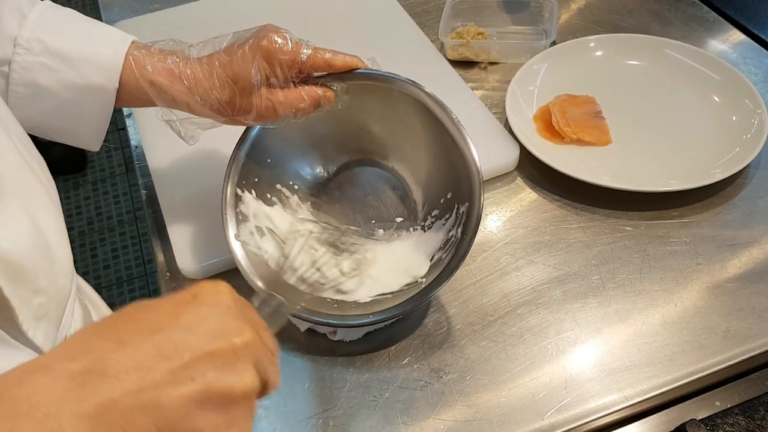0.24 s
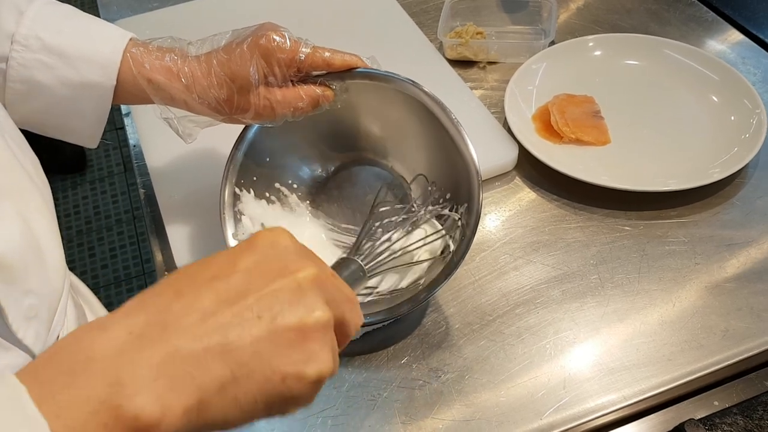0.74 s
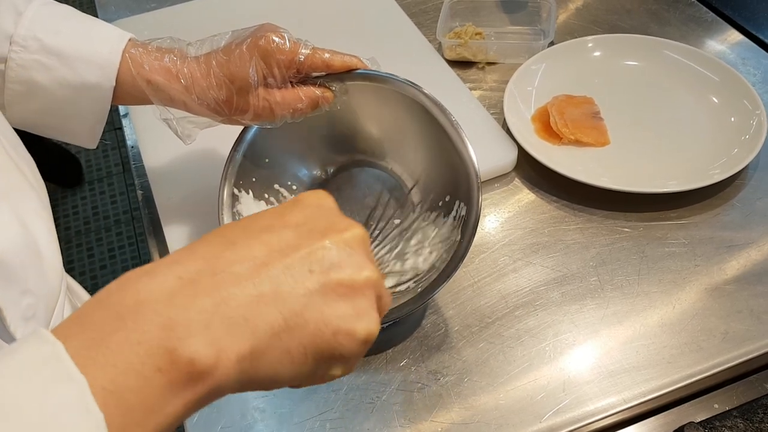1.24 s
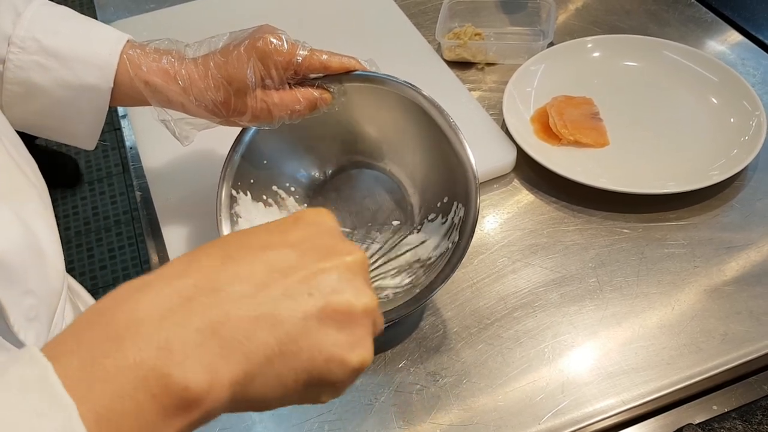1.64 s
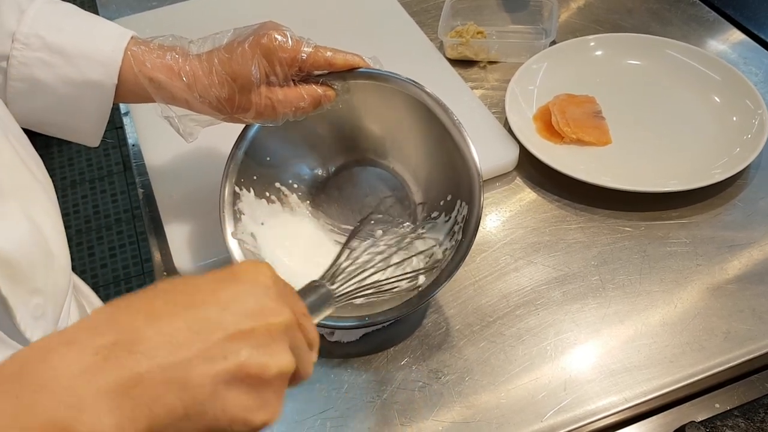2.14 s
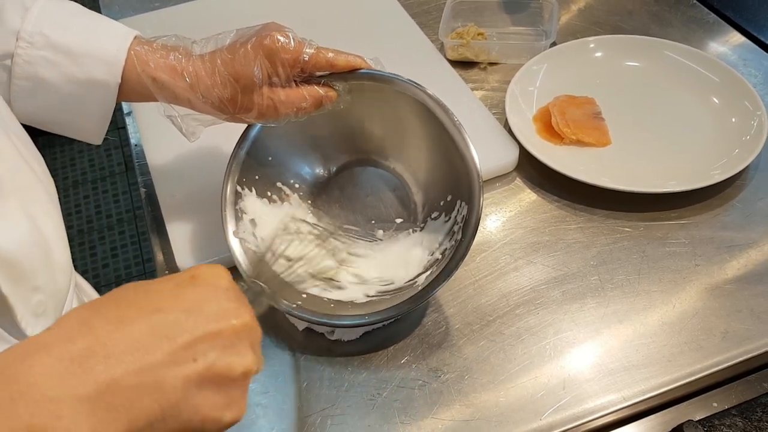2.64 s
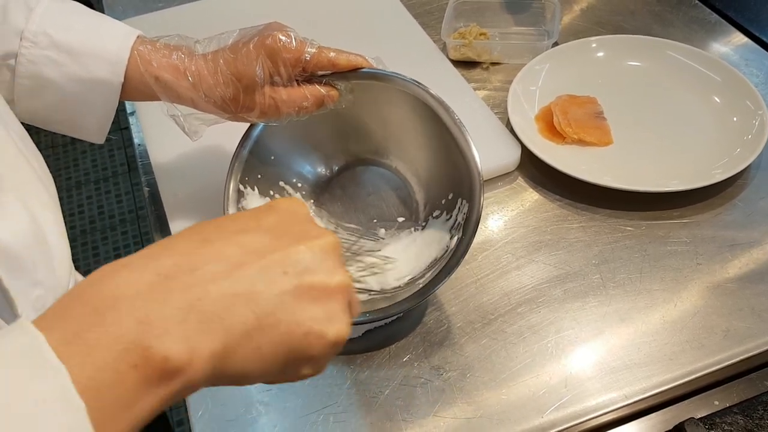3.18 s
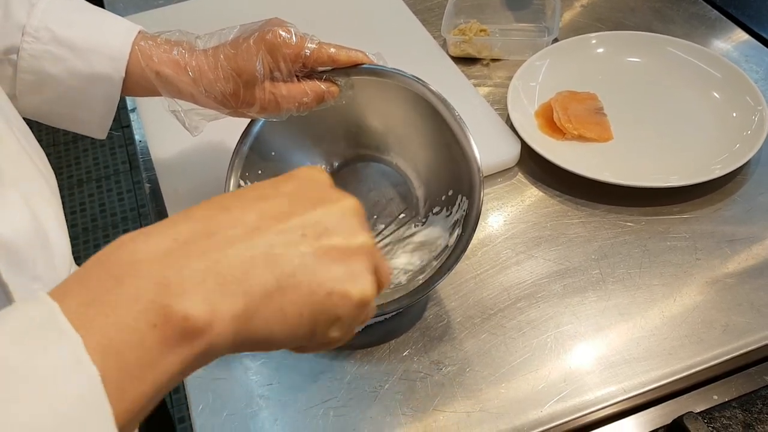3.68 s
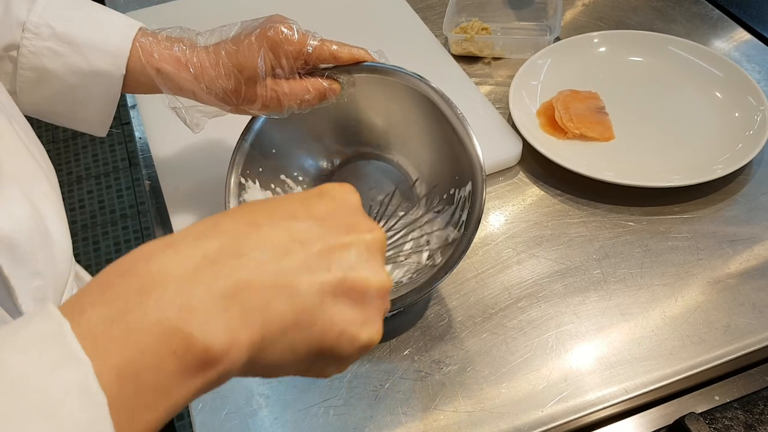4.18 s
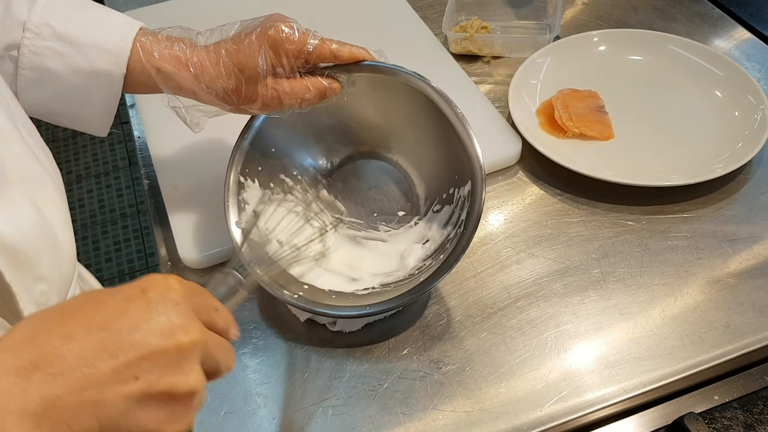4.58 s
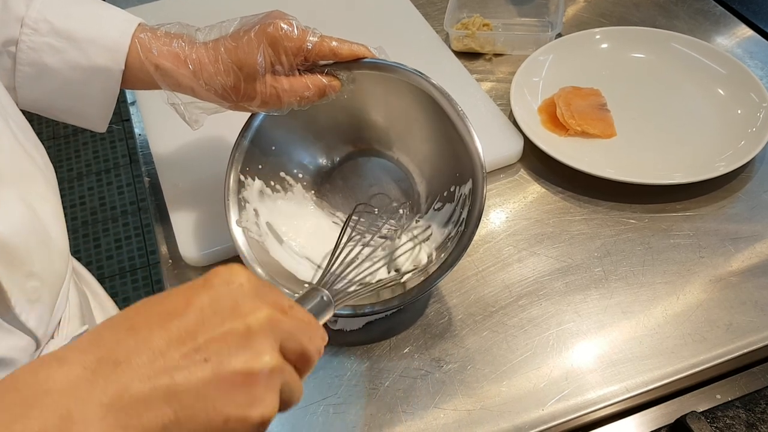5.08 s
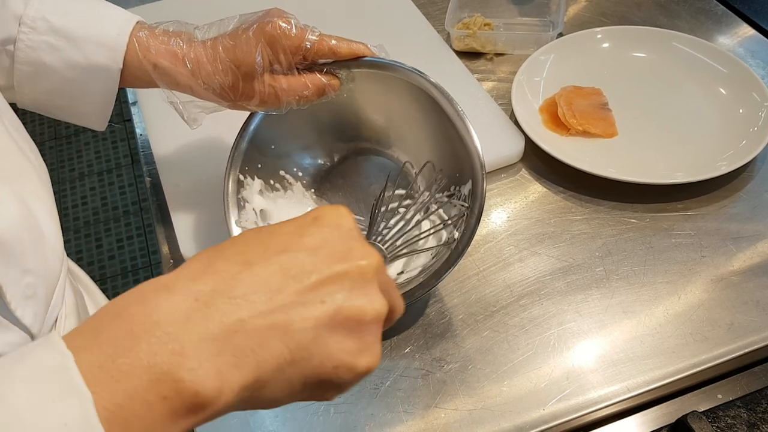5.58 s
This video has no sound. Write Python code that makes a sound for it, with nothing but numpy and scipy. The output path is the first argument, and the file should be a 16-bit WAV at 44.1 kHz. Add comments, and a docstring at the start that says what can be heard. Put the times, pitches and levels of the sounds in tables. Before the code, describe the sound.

Close up, a wire whisk beats cream in a hand-held steel bowl. Bright, damped clanks come about ten times a second at first, then in looser uneven strokes of around five to eight a second, each with a small double touch and a short gritty slide. Faint wire brushing fills the gaps. Low ventilation rumble and a soft motor hum continue underneath in a small hard-surfaced kitchen.

```python
"""Ventilation rumble and a motor hum sound from the start, with the faint brushing of whisk wires.
Almost at once a wire whisk beating cream strikes a steel bowl, in quick flams and short slides.
Uneven noise ticks, shaped by the contact force, ring the bowl's belly, wall, rim and wires.
Shaped noise makes the ventilation and a wavering sine the hum; one dull low bump comes later.
Short reflections from counter and tiles surround the bowl."""
import sys
import numpy as np
from scipy import signal
from scipy.io import wavfile
from scipy.ndimage import uniform_filter1d

SR = 44100
rng = np.random.default_rng(int(sys.argv[2]) if len(sys.argv) > 2 else 0)


def wrap_up_sound(samples):
    """Save the sound to the file named by the first command line argument, as 16-bit audio."""
    columns = np.atleast_2d(samples).T
    # keep every value between -1 and 1, then stretch to whole-number steps
    tamed = np.clip(columns, -1, 1)
    steps = np.round(tamed * 32767).astype(np.int16)
    wavfile.write(sys.argv[1], SR, steps)


N = 256662  # length in samples

# how alike the two microphones hear each pitch: pitch_hz [Hz], likeness [0 to 1]
LIKENESS = [(60, 1), (130, 0.97), (290, 0.9), (640, 0.81), (1410, 0.59), (3100, 0.21), (6820, 0.035),
            (15000, 0.17)]
# left-right balance at each pitch: pitch_hz [Hz], left_over_right_db [dB]
BALANCE = [(60, -1), (110, -4), (200, 1), (380, 0.5), (700, 2), (1290, -1.5), (2380, 1), (4400, -4.5),
           (8120, -3.5), (15000, -1.5)]


def amp(db):
    """Turn decibels into a plain multiplier."""
    return 10 ** (np.asarray(db) / 20)


def evened(x):
    """Scale a signal to an average (RMS) strength of 1."""
    return x / np.sqrt(np.mean(x ** 2) + 1e-20)


def read(points, hz):
    """Read a value between table points, with pitch on a logarithmic scale."""
    point_hz, value = np.transpose(points)
    return np.interp(np.log(hz + 1), np.log(point_hz + 1), value)


def pair(hz, frames):
    """Random spectra for two microphones: a shared part, plus a part with opposite signs."""
    a, b, c, d = rng.standard_normal((frames, len(hz), 4)).T
    same = np.clip(read(LIKENESS, hz), 0, 1)[:, None]
    common = np.sqrt((1 + same) / 2) * (a + 1j * b)
    apart = np.sqrt((1 - same) / 2) * (c + 1j * d)
    tilt = amp(read(BALANCE, hz) / 2)[:, None]
    return np.array([(common + apart) * tilt, (common - apart) / tilt])


def slow_noise():
    """Slowly wandering noise of average strength 1, from random values smoothed twice."""
    smooth = uniform_filter1d(rng.standard_normal(N), 4000)
    return evened(uniform_filter1d(smooth, 4000))


def kitchen():
    """Ventilation is noise with a slightly patchy spectrum; the motor is a wavering sine."""
    # ventilation colour, before its overall level is set: pitch_hz [Hz], level_db [dB per Hz]
    air_colour = [(15, -40), (30, -25), (52, 5), (105, 3.5), (305, 3), (440, -3), (790, -2), (1200, -8),
                  (1400, -6), (1700, -4.5), (1950, -11.5), (2700, -11), (8000, -48), (16500, -41)]
    air_db, hum_hz, hum_db = -37.5, 116.7, -45.5  # air level, hum centre pitch and mean level

    hz, frames = np.fft.rfftfreq(2048, 1 / SR), N // 512 + 5
    patches = uniform_filter1d(rng.standard_normal((frames, len(hz))), 6, 0)
    patches = evened(uniform_filter1d(patches, 12, 1)).T  # in dB
    spectra = pair(hz, frames) * amp(read(air_colour, hz)[:, None] + patches)
    air = signal.istft(spectra, nperseg=2048, noverlap=1536)[1]

    drift, waver_db = slow_noise(), slow_noise()
    turns = np.cumsum(hum_hz + 1.14 * drift) / SR  # drifts by about 1.14 Hz
    hum = np.sqrt(2) * amp(hum_db + waver_db) * np.sin(2 * np.pi * turns)
    return amp(air_db) * evened(air[:, :N]) + hum


def force():
    """Contact strength on belly, wall, rim and wires: steady brushing, quick flams and slides."""
    # one row a contact: start_s [s], rim_db, wall_db, belly_db [blow, dB before the strike gain],
    # slide_db [dB against the blow, before its fade], slide_s [s, time scale of the slide]
    contacts = [(0.0745, -51, -46, -37, -4, 0.014), (0.083, -20.5, -18, -25, -13.5, 0.036),
                (0.1766, -43, -41.0, -30, -15, 0.012), (0.1846, -18, -27, -21.5, -10, 0.042),
                (0.224, -42, -34.0, -27, -14, 0.036), (0.2912, -17.5, -27, -24, -9, 0.028),
                (0.3851, -44.0, -39.0, -27.5, -2, 0.013), (0.3891, -19.5, -26.5, -26.5, -4, 0.033),
                (0.4272, -38, -31, -24, -14.5, 0.048), (0.4921, -17.5, -20.5, -27, -12, 0.031),
                (0.5258, -48, -42.0, -25.5, -4, 0.028), (0.5502, -49.0, -46, -41.0, -11.0, 0.01),
                (0.5956, -37, -43.0, -35.5, 11.5, 0.013), (0.608, -18.5, -24, -22, -8.5, 0.043),
                (0.6973, -43.0, -23, -43, -17, 0.01), (0.7031, -22, -26, -29, -9, 0.035),
                (0.8154, -38, -32, -28, -7, 0.012), (0.8226, -23, -20.5, -25.5, -8, 0.028),
                (0.945, -17, -21.5, -28.5, -14, 0.037), (0.99, -38.0, -40.0, -42, -19, 0.052),
                (1.0401, -41, -27.5, -32, 3, 0.012), (1.067, -51, -36, -33.5, -11, 0.044),
                (1.1062, -38, -42, -36.5, 4.5, 0.01), (1.1741, -19.5, -28, -29.5, -6, 0.026),
                (1.208, -29, -36, -44, 0.5, 0.021), (1.3035, -44.0, -29.5, -26.0, -17.0, 0.032),
                (1.339, -33, -43, -36.5, -2, 0.016), (1.398, -42, -37, -35.5, -3, 0.02),
                (1.422, -21.5, -24.5, -24.5, -12.5, 0.025), (1.545, -50, -33.5, -31, -10.5, 0.032),
                (1.579, -38.5, -44.0, -38.5, 6, 0.019), (1.6343, -45.0, -31.5, -35, -5, 0.012),
                (1.6467, -21.5, -30.5, -36, -6.5, 0.033), (1.7792, -45.0, -30.0, -27, -10.0, 0.037),
                (1.8159, -33, -32, -36, -4.5, 0.015), (1.867, -41, -40, -41.0, -3, 0.014),
                (1.8826, -18, -26.0, -32, -15, 0.039), (1.928, -40, -38.0, -49.0, -5, 0.012),
                (1.9873, -42, -32, -41, -4.0, 0.024), (2.0077, -44, -31, -23, -13, 0.034),
                (2.0439, -33.5, -30.5, -40, 3.5, 0.011), (2.093, -48, -38, -37.5, -2, 0.023),
                (2.1124, -18.0, -19, -28, -20, 0.044), (2.209, -46, -45.0, -38, 1, 0.016),
                (2.221, -25.0, -28.0, -31, -12.5, 0.04), (2.2656, -44, -34, -35, -1, 0.011),
                (2.3138, -55.0, -41.0, -38, -3, 0.012), (2.3377, -23.0, -23, -27, -10.5, 0.032),
                (2.4324, -44, -41, -31, -4, 0.014), (2.4416, -21, -25.5, -33, -22.0, 0.019),
                (2.4678, -37, -33, -26.5, -5, 0.037), (2.5551, -18.5, -20, -23.5, -13.5, 0.042),
                (2.6513, -45, -31, -26.5, 1, 0.011), (2.6565, -19.5, -27, -21, -25, 0.027),
                (2.6813, -27, -27.5, -24.5, -10, 0.031), (2.771, -21.0, -20, -25.5, -12.5, 0.042),
                (2.8681, -37, -44.0, -30, -12, 0.011), (2.8753, -21, -33, -27, -18, 0.041),
                (2.8967, -38, -28.5, -24, -7, 0.034), (2.9977, -21.0, -24.5, -32.0, -10.5, 0.047),
                (3.104, -22, -15, -22.5, -10.5, 0.024), (3.1235, -32, -29, -24.5, -9.5, 0.039),
                (3.201, -60, -39, -38, -16, 0.018), (3.2213, -17.5, -28.0, -28, -14, 0.049),
                (3.3277, -42.5, -33.5, -33.5, 5.5, 0.034), (3.3796, -36, -39, -34, -6, 0.015),
                (3.4453, -17.5, -22.5, -26, -15.5, 0.047), (3.5587, -47, -33, -34.5, -3.0, 0.019),
                (3.5738, -40, -28, -25.5, -5.5, 0.03), (3.6083, -38, -37.5, -34.5, -0.5, 0.023),
                (3.655, -46, -35, -35.5, -3.0, 0.016), (3.6756, -18.5, -31, -30, -11, 0.029),
                (3.7166, -34.5, -41, -37.0, -24.0, 0.04), (3.7837, -53, -40, -45.5, 5, 0.039),
                (3.816, -47.0, -27.0, -25, -7, 0.021), (3.85, -39.5, -48, -41.5, 3, 0.022),
                (3.903, -44, -39.0, -43, -2.0, 0.027), (3.9254, -20.0, -33, -33.5, -8.5, 0.037),
                (3.9837, -37.5, -40, -34, -5.5, 0.016), (4.0503, -53, -28.0, -30, -17, 0.031),
                (4.0725, -39, -51.0, -40, -7.0, 0.012), (4.0893, -38, -51.0, -38.0, -2.5, 0.015),
                (4.153, -32, -33, -32, -4, 0.014), (4.1612, -17, -29, -31.5, -12, 0.053),
                (4.2861, -41, -31.5, -29.5, -4, 0.042), (4.372, -54, -37, -42.5, 8, 0.025),
                (4.4019, -19, -25, -33, -14.5, 0.041), (4.535, -21, -23.5, -23, -10.5, 0.058),
                (4.581, -35.0, -22.5, -26, -16, 0.061), (4.6335, -20, -24.5, -27.5, -12, 0.036),
                (4.6643, -35.0, -33.5, -33, -13, 0.012), (4.752, -21, -23, -27.5, -4, 0.026),
                (4.8456, -19.5, -23.5, -25, -11, 0.021), (4.9631, -18.5, -18, -22.0, -12, 0.034),
                (5.0552, -19.0, -17.5, -28, -7.5, 0.021), (5.1059, -36.5, -43, -29, -1, 0.008),
                (5.1807, -23.5, -22.5, -27, -6.5, 0.035), (5.2661, -42, -30, -31, -3, 0.014),
                (5.272, -20, -19.5, -26.5, -11, 0.023), (5.328, -39.5, -38.0, -29.5, -9, 0.021),
                (5.4145, -39.5, -29.5, -34, 0, 0.024), (5.541, -22.5, -32, -31.5, -6, 0.037),
                (5.6006, -40, -33.5, -35.0, -21.0, 0.022), (5.6515, -59, -37, -42.0, -11, 0.031),
                (5.6776, -39.0, -31.5, -31, -16, 0.043), (5.721, -40.5, -45.0, -36, -31, 0.041),
                (5.758, -56, -44, -39, -2.0, 0.012), (5.7761, -19.5, -29, -32, -9, 0.049)]
    # brushing between contacts, before the part offsets: time_s [s], level_db [dB]
    brushing = [(0.0, -52), (0.11, -81), (0.32, -60), (0.76, -61), (1.1, -69), (1.7, -65), (2.07, -65),
                (2.5, -61.5), (3.05, -62), (3.7, -68), (4.03, -59.5), (4.38, -71), (4.67, -63), (5.17, -59),
                (5.82, -65)]
    # brushing offset of each part: belly_db, wall_db, rim_db, wires_db [dB]
    brushing_parts_db = [14, -6.5, -16.5, 12.5]
    # strike gain, as a ringing part takes up more than it gives off: belly, wall, rim, wires [dB]
    strike_gain_db = [3.44, 2.76, 4.74, 3.15]
    # how the wires rattle with the blow: against_rim_db, against_belly_db [dB]
    wires_db = [-2, -5.5]
    swell_base_db, swell_per_db = 3.2, 0.76  # a high touch slides into the belly, a low one out
    rise_s, pan_db = 0.0042, 1  # rise of the slide; left over right

    time_s, stir_db = np.transpose(brushing)
    stir_db = np.interp(np.arange(N) / SR, time_s, stir_db)
    stir = amp(stir_db + np.array(brushing_parts_db)[:, None])
    power = np.array([stir, stir]) ** 2  # left and right

    t = np.arange(6000) / SR
    rough = uniform_filter1d(rng.standard_normal(N + len(t)), 130)
    stutter = amp(4.13 * evened(rough))  # wires catch and slip
    flam_lengths = rng.uniform(0.0014, 0.0024, len(contacts))  # seconds

    for row, flam_s in zip(contacts, flam_lengths):
        start_s, rim_db, wall_db, belly_db, slide_db, slide_s = row
        belly, wall, rim = amp([belly_db, wall_db, rim_db])
        wires = np.hypot(*amp(wires_db) * [rim, belly])
        blow = np.array([[belly], [wall], [rim], [wires]])

        flam = np.exp(-(t / flam_s) ** 2) * np.minimum(t / .0004, 1)
        flam = flam / np.sqrt(np.sum(flam ** 2) / 300)  # energy of 300 full-strength samples
        strike = amp(strike_gain_db)[:, None] * flam

        at = round(start_s * SR)
        gone = t / slide_s
        slide = amp(slide_db - 1.37 * gone) / (1 + gone ** 12.0)  # fades, then lifts off
        slide = slide * np.minimum(t / rise_s, 1) * stutter[at:at + len(t)]
        swell_db = swell_base_db + swell_per_db * (rim_db - belly_db)
        # the balance of belly, wall, rim and wires shifts during the slide
        shift_db = np.minimum(gone, 1) * np.array([[swell_db], [.5 * swell_db], [-3], [2.5]])

        shape = blow ** 2 * (strike ** 2 + (slide * amp(shift_db)) ** 2)
        for side, sign in enumerate((.5, -.5)):
            power[side, :, at:at + len(t)] += (shape * amp(sign * pan_db) ** 2)[:, :N - at]
    return np.sqrt(power)


def grain(ticks, lo_hz, hi_hz):
    """The ticks that one part takes up; the hand sets their pressure, chance only their grain."""
    lo_hz, hi_hz = .8 * lo_hz, 1.2 * hi_hz
    band = signal.butter(2, [lo_hz, hi_hz], "bandpass", fs=SR, output="sos")
    taken = signal.sosfilt(band, ticks)
    steady = taken / (uniform_filter1d(taken ** 2, 70) + 1e-9) ** 0.41  # evens out the loudness
    return evened(steady) * np.sqrt((hi_hz - lo_hz) / (SR / 2))


def ring(modes, lo_hz, hi_hz, clatter_db):
    """One tick at one spot: a noisy crack that rings on, plus any clear tones; energy 1 a side."""
    # many small modes of wires and steel, before scaling: pitch_hz [Hz], level_db [dB per Hz]
    clatter_colour = [(500, -4), (800, -8), (1500, 3), (2300, -16), (2750, -17.5), (3200, -2.5),
                      (3800, -12.5), (6900, -20.5), (8000, -14), (8900, -18), (9700, -26.5), (13500, -24.5),
                      (15800, -31.5), (16500, -63)]
    # time to fall 60 dB in the first crack: pitch_hz [Hz], fall_s [s]
    crack_fall = [(500, 0.094), (3000, 0.019), (8000, 0.034), (16000, 0.0029)]
    # time to fall 60 dB in the ringing after it: pitch_hz [Hz], fall_s [s]
    clatter_fall = [(500, 0.14), (3000, 0.14), (8000, 0.15), (16000, 0.21)]
    ring_on_db, place_db = -10.5, 10.5  # ringing under the crack; greatest change a spot makes

    size, hz = 6144, np.fft.rfftfreq(128, 1 / SR)
    t = np.arange(size) / SR
    spectra = pair(hz, size // 32 + 1) * amp(read(clatter_colour, hz))[:, None]
    fall_db = -60 * np.arange(spectra.shape[2]) * 32 / SR  # divided by fall_s below
    crack = amp(fall_db / read(crack_fall, hz)[:, None])
    ringing = amp(ring_on_db + fall_db / read(clatter_fall, hz)[:, None])
    noise = signal.istft(spectra * (crack + ringing), nperseg=128, noverlap=96)[1][:, :size]
    band = signal.butter(3, [lo_hz, hi_hz], "bandpass", fs=SR, output="sos")
    out = amp(clatter_db) * evened(signal.sosfilt(band, noise))

    if modes:
        f, db, t60 = np.transpose(modes)[:, :, None]
        favour, turn, lean = rng.uniform(-1, 1, (3, len(modes), 1))
        spread = np.arccos(np.clip(read(LIKENESS, f), 0, 1)) * lean  # patches of steel radiate apart
        decay = amp(db + place_db * favour - 60 * t / t60)
        phase = 2 * np.pi * f * t + np.pi * turn
        tones = np.array([(decay * np.sin(phase + side * spread)).sum(0) for side in (1, -1)])
        tones = tones * amp(read(BALANCE, f.mean()) * np.array([[.5], [-.5]]))
        out = out + evened(signal.sosfilt(band, tones))
    return out / np.linalg.norm(out) * np.sqrt(2)


def whisk():
    """Uneven ticks of the wires, scaled by contact force, ring four parts from changing spots."""
    # clear tones of the held, cream-damped bowl; each spot alters their levels:
    # pitch_hz [Hz], level_db [dB], fall_s [s to fall 60 dB]
    belly_modes = [(672, -3, .11), (712, -4, .1), (787, 0, .09), (845, -4, .09), (941, -3, .09),
                   (1120, 0, .07)]
    wall_modes = [(1380, -4, .07), (1417, 0, .08), (1480, -3, .08), (1512, -3, .08), (1640, -4, .06),
                  (1678, -2, .06), (1750, -5, .06)]
    rim_modes = [(2120, -3, .07), (2161, 0, .075), (2270, -5, .06), (2352, 0, .08), (2437, -1, .08),
                 (2500, -6, .06), (2990, -12, .05), (3157, -4, .065), (3250, -7, .055), (3408, -11, .055)]
    # edges of the pitch bands of belly, wall, rim and wires: pitch_hz [Hz]
    borders_hz = [560, 1250, 1900, 3700, 18000]
    # clatter against the clear tones: belly_db, wall_db, rim_db [dB]
    clatter_levels_db = [-2, -4.5, -0.5]
    # the whole bowl flexes with the rim force: pitch_hz [Hz], level_db [dB per unit force],
    # fall_s [s to fall 60 dB]
    wobble = (313, -42, .11)
    places = 6  # spots of the wall that the wires touch

    tick_size = amp(3.92 * np.minimum(rng.exponential(1, N), 5))
    ticks = rng.standard_normal(N) * tick_size * (rng.random(N) < .3)
    push = force()

    share = uniform_filter1d(rng.standard_normal((places, N)), 200) ** 2
    share = np.sqrt(share / share.sum(0))  # the touching spot wanders in a few ms

    modes = (belly_modes, wall_modes, rim_modes, [])
    parts = list(zip(modes, borders_hz, borders_hz[1:], clatter_levels_db + [0]))
    drive = [push[:, k] * grain(ticks, *part[1:3]) for k, part in enumerate(parts)]
    bowl = np.zeros((2, N))
    for spot in share:
        for k, part in enumerate(parts):
            bowl += signal.oaconvolve(drive[k] * spot, ring(*part), axes=1)[:, :N]

    hz, db, t60 = wobble
    t = np.arange(8000) / SR
    flex = amp(db - 60 * t / t60) * np.sin(2 * np.pi * hz * t)
    rim_push = push[:, 2].mean(0) * evened(ticks)
    return bowl + signal.oaconvolve(rim_push, flex)[:N]


def room(x):
    """Sparse reflections from counter and tiles, softened in the treble and dying away."""
    t60 = 0.31  # seconds to fall 60 dB
    at = np.arange(200, 20000, 20) + rng.integers(0, 20, (2, 990))
    echoes = rng.choice([-1., 1.], at.shape) * amp(-60 * at / SR / t60)
    taps = np.zeros((2, 20020))
    np.put_along_axis(taps, at, echoes, 1)
    taps = signal.lfilter([1], [1, -.3], taps)
    return signal.fftconvolve(x, taps / np.linalg.norm(taps[0]), axes=1)[:, :N]


def bump():
    """A soft knock that sounds two low, damped tones."""
    # the damped tones: pitch_hz [Hz], level_db [dB], fall_s [s to fall 60 dB]
    knock_tones = [(231, -27, 0.11), (375, -23, 0.058)]
    start_s, rise_s = 3.984, 0.0021
    t = np.maximum(np.arange(N) / SR - start_s, 0)
    tones = sum(amp(db - 60 * t / t60) * np.sin(2 * np.pi * hz * t) for hz, db, t60 in knock_tones)
    return tones * np.minimum(t / rise_s, 1)


def scene():
    """Bowl and bump, their reflections 18.5 dB down in gain, and the kitchen behind."""
    bowl = whisk() + bump()
    return bowl + amp(-18.5) * room(bowl) + kitchen()


def record(dry):
    """The input stage rounds off high peaks, then a low-pass filter removes the top treble."""
    knee, edge_hz = .85, 16300  # ceiling of the rounding; low-pass edge
    rounded = knee * np.tanh(dry / knee)
    low_pass = signal.firwin(301, edge_hz, window=("kaiser", 9), fs=SR)
    return signal.oaconvolve(rounded, low_pass[None], "same")


dry = scene()
out = record(dry)
wrap_up_sound(out)
```